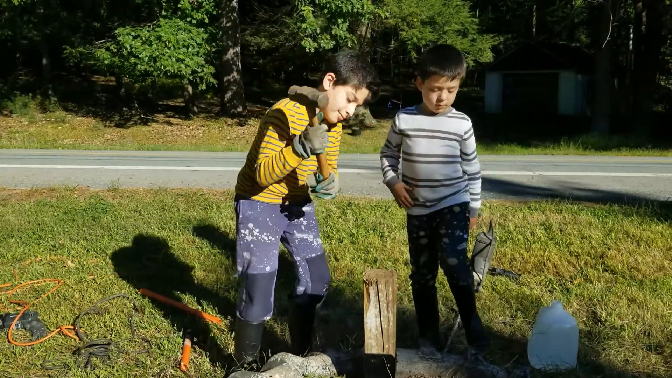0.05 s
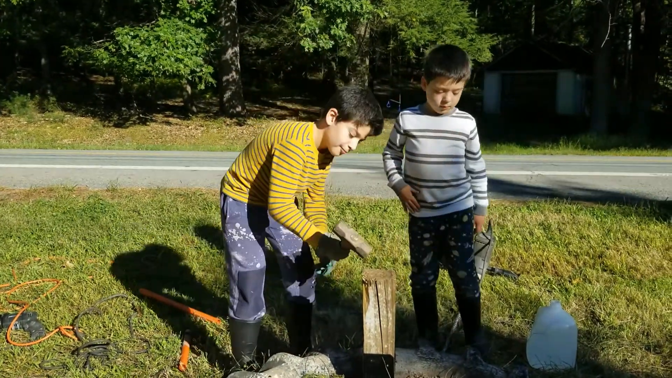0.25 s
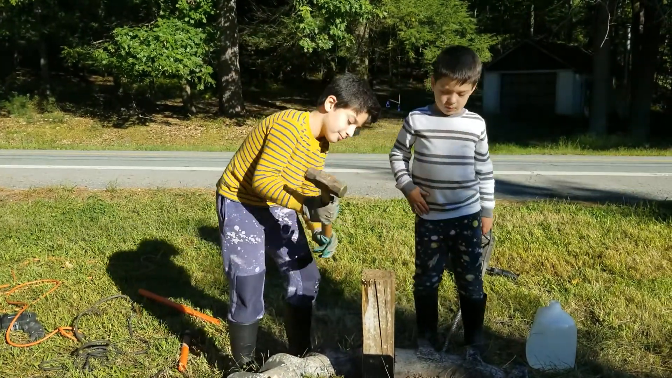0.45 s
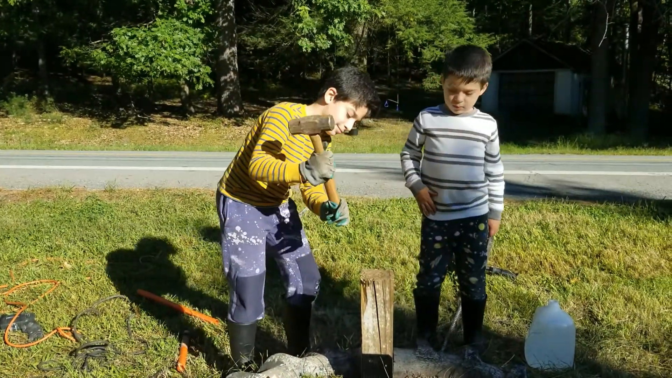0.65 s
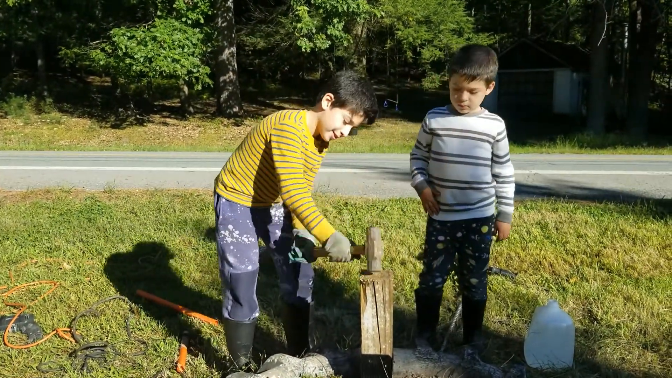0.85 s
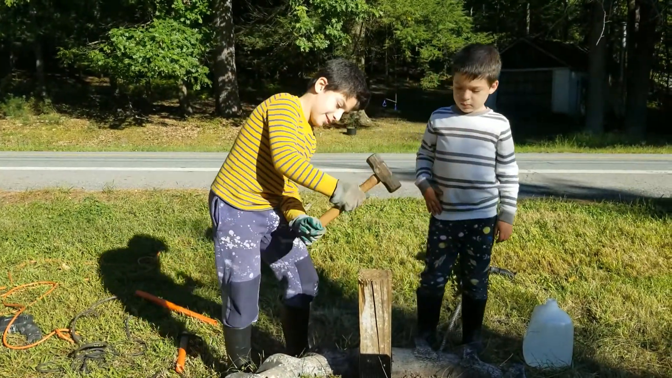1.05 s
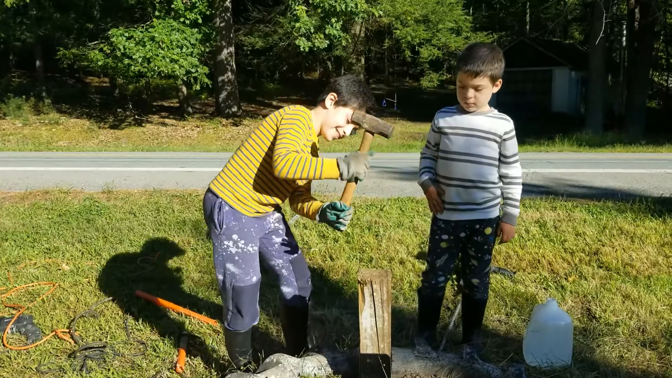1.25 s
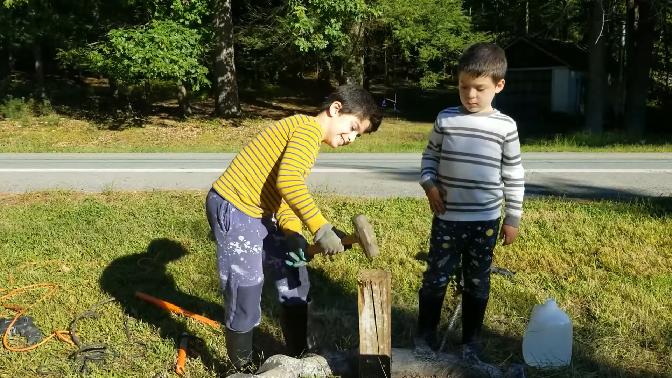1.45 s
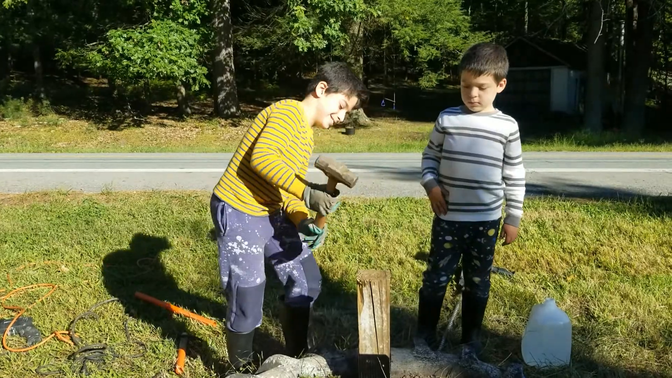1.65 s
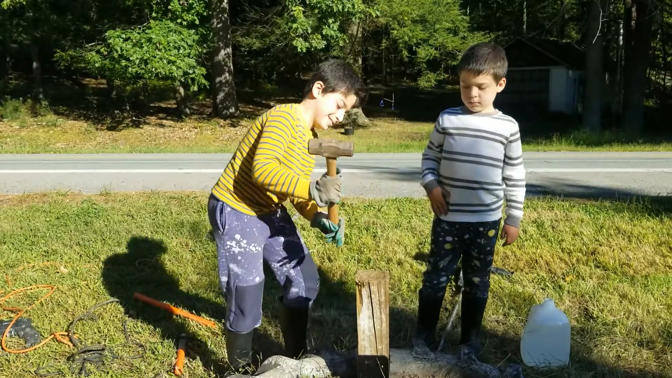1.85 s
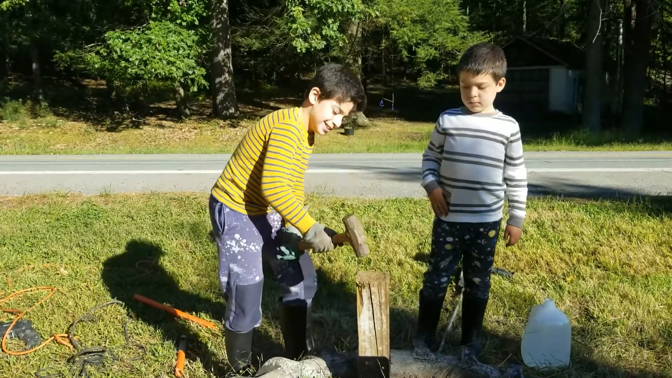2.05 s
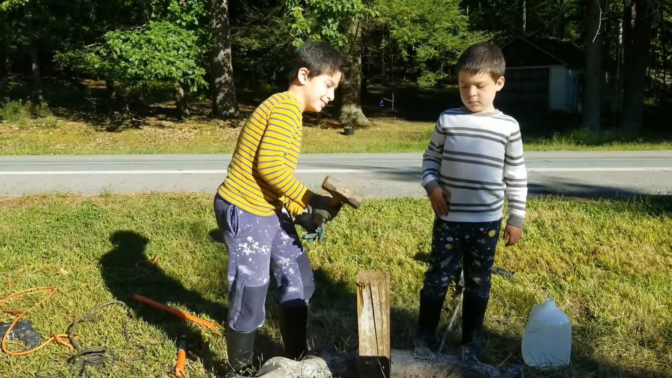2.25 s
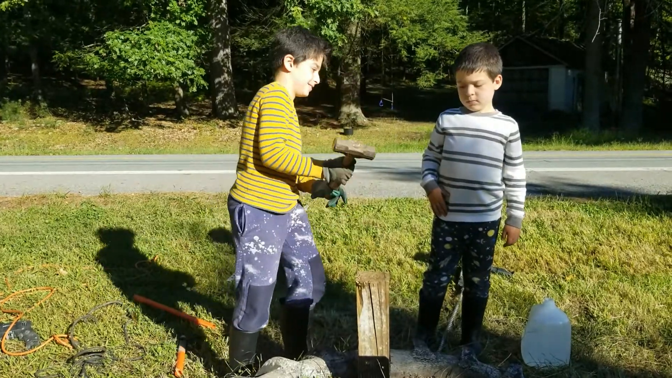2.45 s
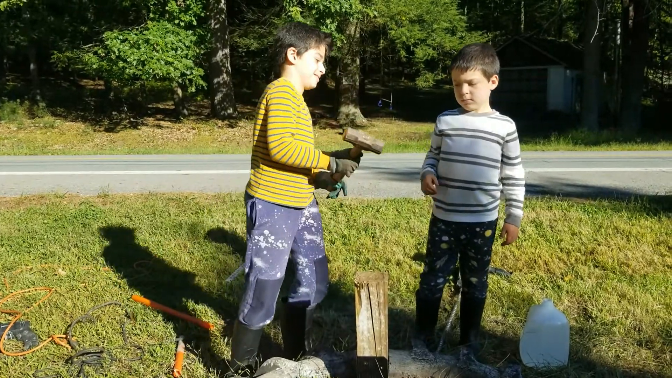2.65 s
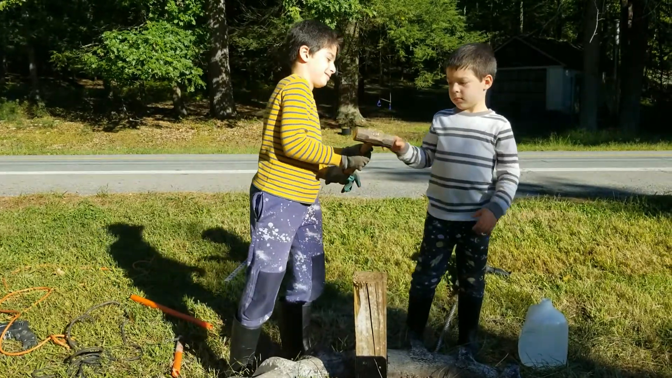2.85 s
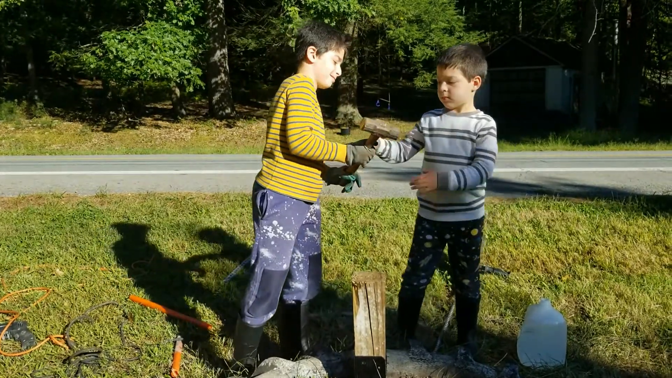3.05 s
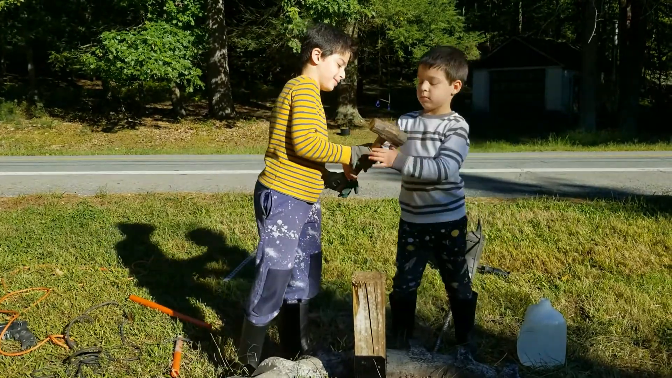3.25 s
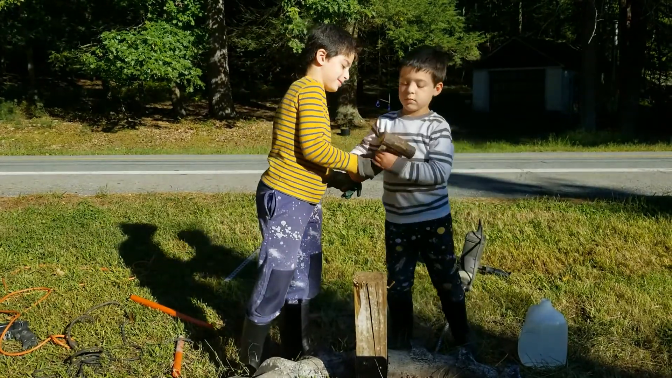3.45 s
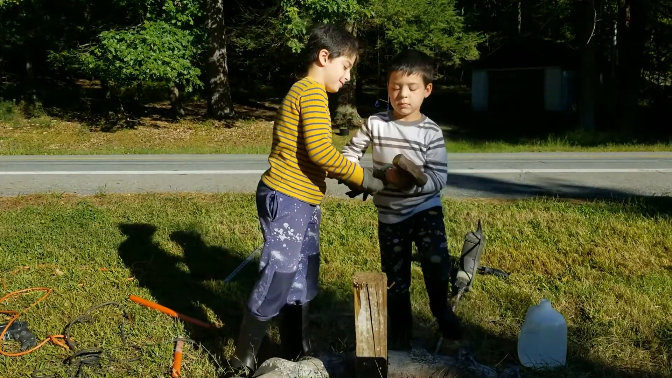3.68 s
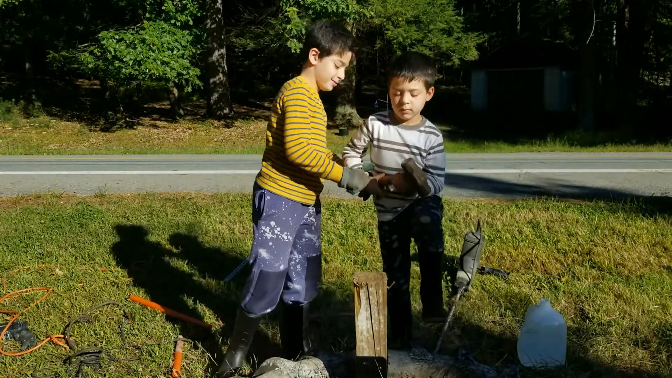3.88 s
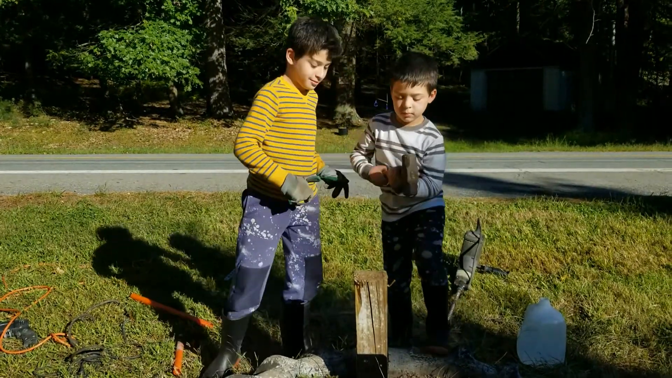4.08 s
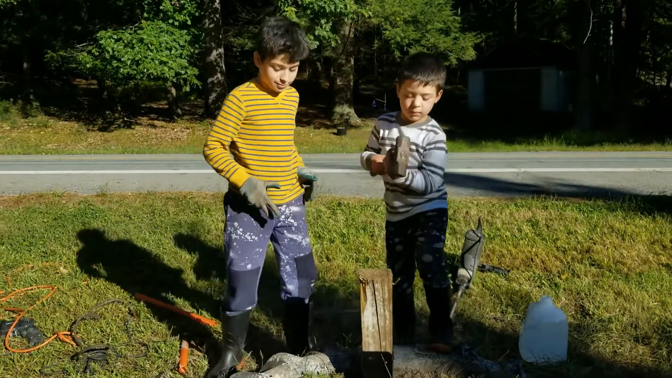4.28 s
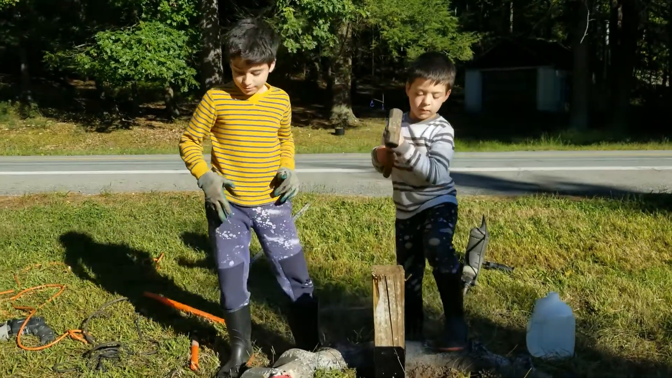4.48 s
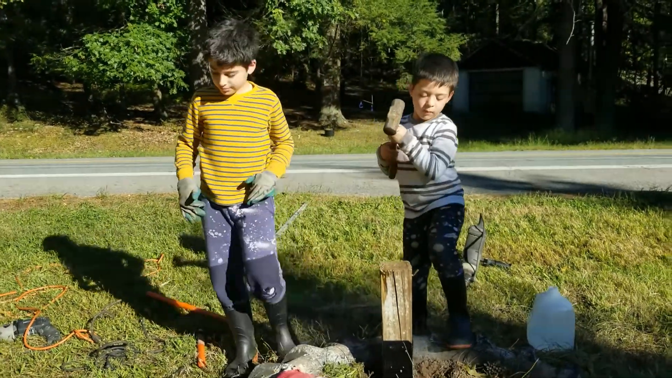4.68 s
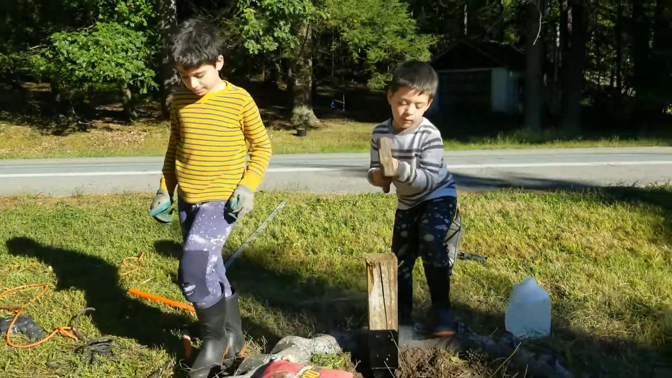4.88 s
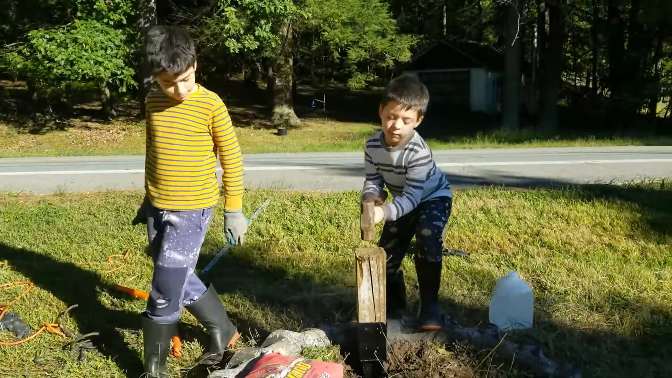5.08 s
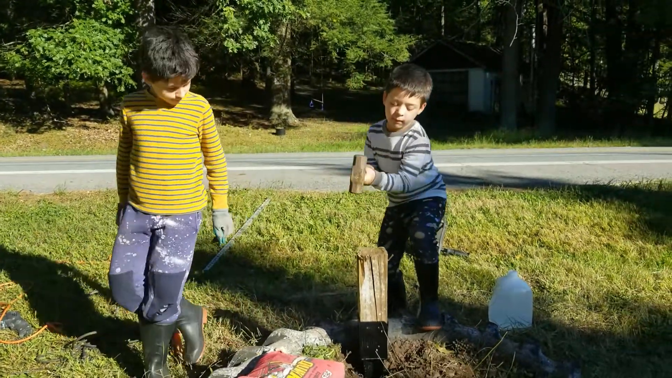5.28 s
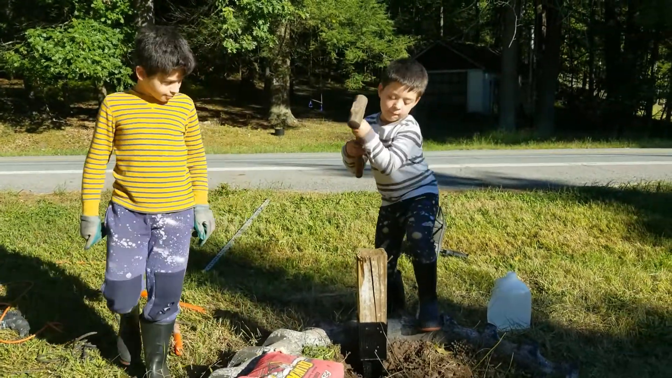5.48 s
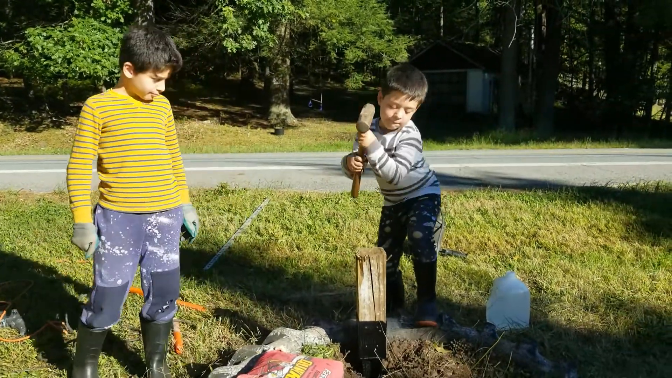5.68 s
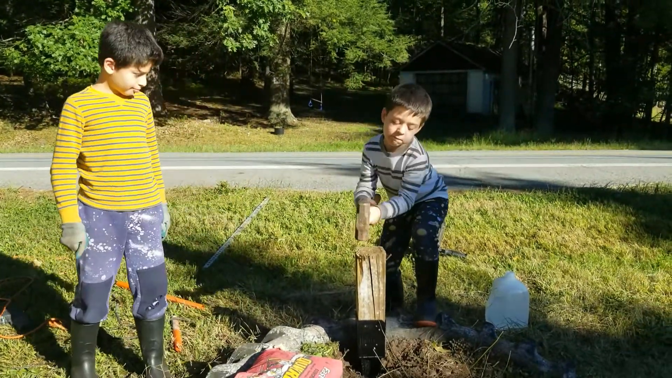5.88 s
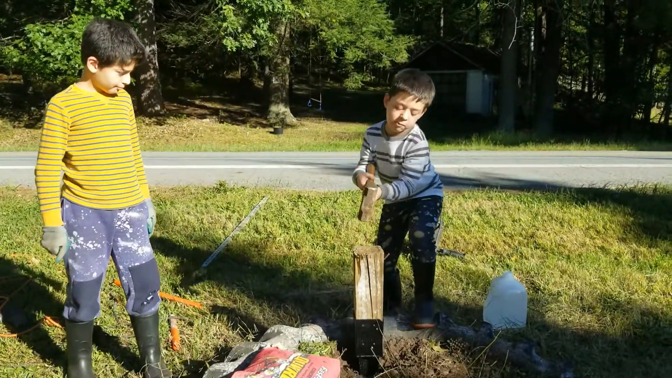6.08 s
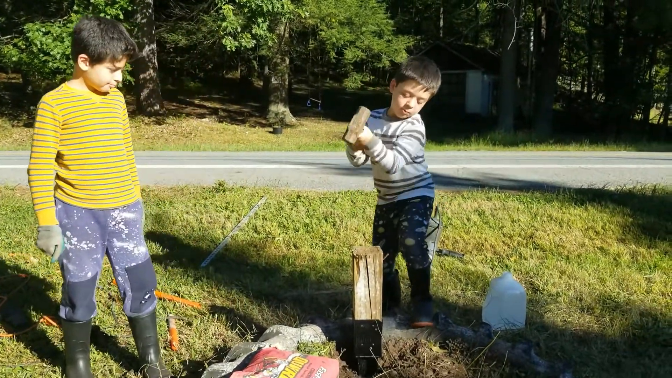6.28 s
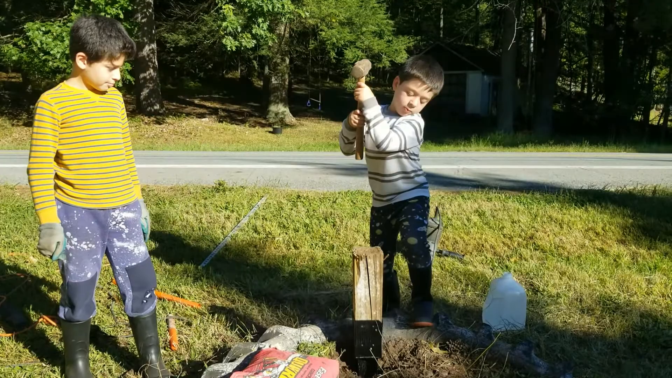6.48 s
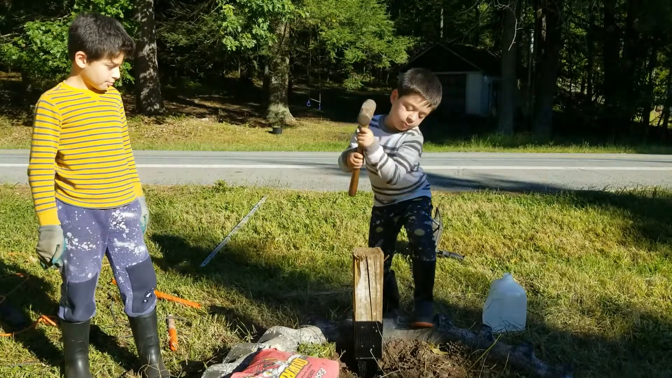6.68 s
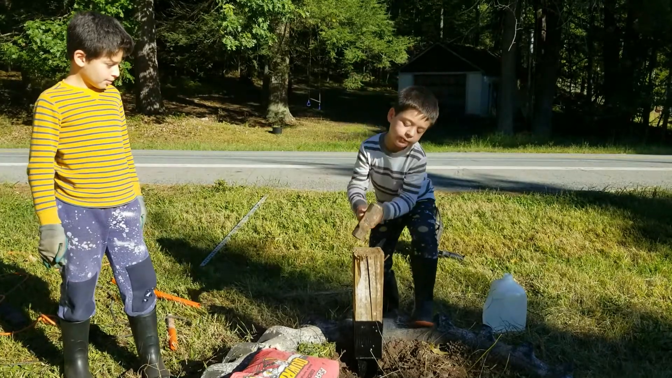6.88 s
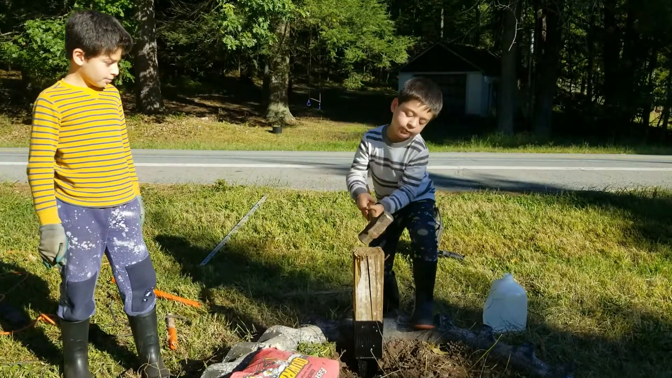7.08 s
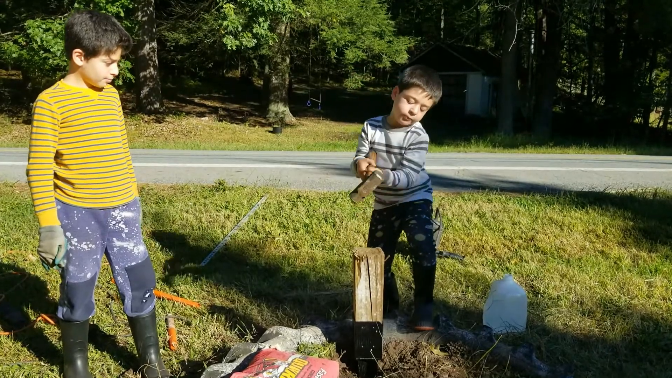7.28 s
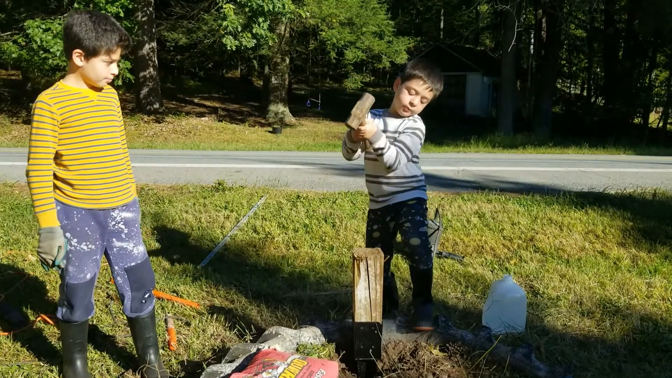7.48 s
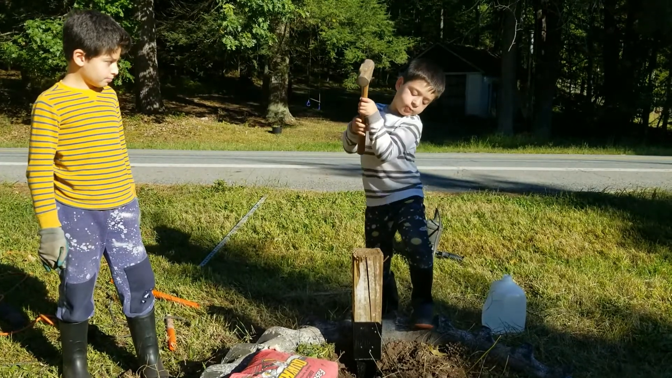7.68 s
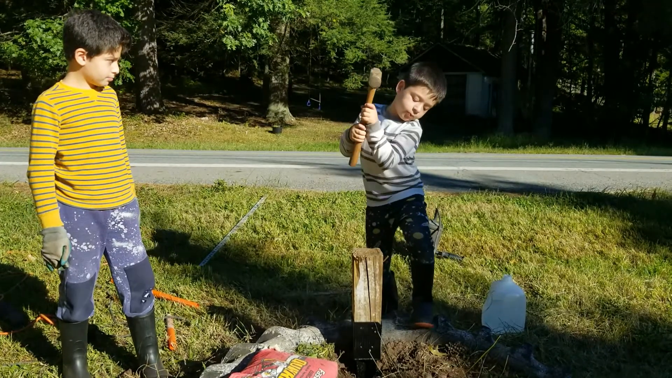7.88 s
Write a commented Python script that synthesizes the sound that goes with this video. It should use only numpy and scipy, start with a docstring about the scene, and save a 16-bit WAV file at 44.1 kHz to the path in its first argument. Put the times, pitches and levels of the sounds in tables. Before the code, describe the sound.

On a lawn beside a wood, seven cracking sledgehammer blows drive a wooden post into the soil, each with a short, faint echo. Four come quickly, then after a gap of three seconds come three more, wider apart. Soft boot steps and a slight rustle of cloth fall between them. Wind buffets the microphone midway, a far car gradually draws nearer, and insects and two thin bird calls stay very faint.

```python
"""Seven sledgehammer blows drive a wooden post into a lawn: each a crack of crushed fibres, a ping of iron,
a knock of the post and a thump of soil, answered faintly by the edge of a wood. Between them boots shift
and clothes rustle. Gusts buffet the microphone and the tyre roar of a far car draws nearer.
Insects sing throughout, and two thin bird calls slide to their pitch and fade."""
import sys
import numpy as np
from scipy import signal
from scipy.fft import rfft, irfft, next_fast_len
from scipy.io import wavfile

SR = 44100
rng = np.random.default_rng(int(sys.argv[2]) if len(sys.argv) > 2 else 0)


def output_pcm(signal):
    """Save a mono or channel-first signal as 16-bit PCM at the path in sys.argv[1].

    Samples are clipped to [-1, 1] before scaling.
    """
    pcm = np.clip(np.atleast_2d(signal).T, -1, 1) * 32767
    wavfile.write(sys.argv[1], SR, np.round(pcm).astype(np.int16))


N = 350154
TIME = np.arange(N) / SR


def hammer(crack_trim_db=-3, head_trim_db=-2, sideways_db=-8, give_s=0.0007, load_s=0.0022):
    """The crack leads; post and soil follow as the wood takes the load. Returns direct and echo send."""
    # blows: start_s, knock_db, ring_db, ring_length_factor, clack_db, crush_db, tilt_db_per_octave, send_db
    blows = [(0.2056, -9, -19, 1.7, -6, -1.5, 0.5, -0.5), (0.8461, 1.5, -4.5, 1.2, -3, -8.5, -2, -5.5),
             (1.401, 1, 4, 1.04, -4, -6.5, -3.5, -4.5), (1.9803, -1, 0, 0.71, -3, -8, -3.5, -2.5),
             (4.9940, -0.5, 0.5, 0.68, -2.5, -10, -1, -4.5), (5.8355, -1.5, -2.5, 0.99, -1, -17, 2, -1.5),
             (6.8219, -1.5, -1, 0.91, 1.5, -8.5, -5, 1)]
    # the post's main ring along the grain: pitch_hz, level_db, t60_s
    ring_modes = [(954, -10, .035), (1098, -2.5, .036), (1212, -11, .038)]
    # the post knocking as a whole: pitch_hz, level_db, t60_s
    knock_modes = [(380.1, -2, 0.016), (514, -1.5, 0.022), (682, -11.5, .025), (819, -14.5, 0.038)]
    # cross-grain clack, woken by an off-centre face: pitch_hz, level_db, t60_s
    clack_modes = [(1367, -13.5, 0.033), (1533, -13.5, .032), (1770, -13.5, 0.025), (2025.5, -15.5, 0.028),
                   (2316, -17, 0.032)]
    # low thump of the post and the soil round it: pitch_hz, level_db, t60_s
    soil_modes = [(72, -26, 0.065), (112, -20, 0.073), (186, -19, 0.041)]
    # ping of the iron head, damped by the wood: pitch_hz, level_db, t60_s
    head_modes = [(2490, -14.5, 0.0063), (5070, -8.5, 0.016), (8190, -15.5, .022), (9290, -19, 0.01)]
    # splinters and the loose handle: start_s, level_db, tilt_db_per_octave
    ticks = [(0.2327, -26, 2.5), (7.0527, -33.5, -6.5)]
    direct, send, t = np.zeros(N), np.zeros(N), TIME[:SR // 4]
    for start_s, knock_db, ring_db, length, clack_db, crush_db, tilt_db, send_db in blows:
        ring = struck(ring_modes, t, scatter_db=3.5, detune=0.005, length=length) * onset(t, load_s)
        body = from_db(ring_db) * ring
        body += from_db(knock_db) * struck(knock_modes, t, scatter_db=2, detune=0.014)
        body -= from_db(clack_db) * struck(clack_modes, t, scatter_db=0.5, detune=0.028)
        body -= struck(soil_modes, t, scatter_db=-1.4, detune=0.01)
        body += from_db(head_trim_db + crush_db) * struck(head_modes, t, scatter_db=0.5, detune=0.0034)
        blow = from_db(crack_trim_db + crush_db) * crack(t, tilt_db)
        add(blow, give_s, body)
        add(direct, start_s, blow)
        add(send, start_s, from_db(send_db) * blow)
        # the post's flanks throw the ring to the trees however the face lands
        add(send, start_s + give_s, from_db(sideways_db) * ring)
    for start_s, level_db, tilt_db in ticks:
        add(direct, start_s, from_db(level_db) * crack(t, tilt_db))
    return direct, send


def crack(t, tilt_db, rise_s=0.00041, crush_s=0.002, buzz_db=-12, buzz_t60_s=0.035):
    """Fibres give way while the face presses in, then the split end grain buzzes out."""
    # colour of crushing fibres: frequency_hz, level_db
    fibre_colour = [(700, -0.5), (1500, 1), (2600, -3.5), (3200, -5), (3700, 0), (4200, -4.5), (5100, -1.5),
                    (6300, -9), (9300, -5.5), (10600, -17.5), (15000, -18)]
    pressure = np.exp(-(t / crush_s) ** 2) + from_db(buzz_db) * dying(t, buzz_t60_s)
    return noise(fibre_colour, len(t), tilt_db) * pressure * onset(t, rise_s)


def struck(modes, t, scatter_db, detune, length=1):
    """Modes of alternating sign ring out from their full level and die away; each blow finds them a little
    changed."""
    out = 0
    for k, (hz, level_db, t60_s) in enumerate(modes):
        gain = (-1) ** k * from_db(level_db + scatter_db * rng.standard_normal())
        pitch_hz = hz * (1 + detune * rng.standard_normal())
        out += gain * dying(t, t60_s * length) * np.sin(2 * np.pi * pitch_hz * t)
    return out


def echoes(send, near_t60_s=0.13, trees_s=0.08, swell_s=0.006, lawn_db=-1.5):
    """Close things scatter each blow at once, the trunks later; so many paths blur it into noise."""
    # echo of things close by: frequency_hz, level_db
    near_colour = [(150, -25.5), (480, -35.5), (1100, -30), (2500, -22), (6000, -18), (15000, -16)]
    # echo of the trees: frequency_hz, level_db
    tree_colour = [(150, -36), (480, -35.5), (750, -30), (1100, -36.5), (1700, -26.5), (2600, -25),
                   (5000, -23), (9000, -21.5), (15000, -26.5)]
    # decay among the trees: frequency_hz, t60_s
    tree_decay = [(150, 1), (1000, 0.99), (2500, 0.56), (5000, 0.74), (9000, 0.33), (15000, 0.22)]
    t, out = TIME[:SR], 0
    edges_hz = np.geomspace(120, 17000, 17)
    arrival = from_db(lawn_db) * onset(t, swell_s) + 0.5 * (1 + np.tanh((t - trees_s) / swell_s))
    near = (dying(t, near_t60_s) * onset(t, swell_s)) ** 2
    for band in zip(edges_hz, edges_hz[1:]):
        hz = np.sqrt(band[0] * band[1])
        far = (arrival * dying(t, at_hz(tree_decay, hz))) ** 2
        paths = from_db(at_hz(tree_colour, hz)) ** 2 * far / far.sum()
        paths += from_db(at_hz(near_colour, hz)) ** 2 * near / near.sum()
        energy = signal.fftconvolve(cut(send + 1e-18, band, "band") ** 2, paths)[:N]
        wash = rms_one(cut(rng.standard_normal(N), band, "band", order=3))
        out += np.sqrt(np.abs(energy)) * wash
    return out


def boots(rise_s=0.0016, t60_s=0.093):
    """Boots on turf and soft bumps: dull puffs that die quickly."""
    # contacts: start_s, level_db, top_hz
    contacts = [(3.305, -38.5, 64), (3.973, -36.5, 604), (3.996, -42, 447), (4.847, -31.5, 600),
                (5.656, -48.5, 352), (7.053, -36, 450)]
    out, t = np.zeros(N), TIME[:SR // 4]
    for start_s, level_db, top_hz in contacts:
        dull = cut(rng.standard_normal(len(t)), top_hz, "low", order=3)
        puff = rms_one(cut(dull, 34, "high"))
        add(out, start_s, from_db(level_db) * puff * onset(t, rise_s) * dying(t, t60_s))
    return out


def rustles(grain_db=2.5, snag_db=4, snags_per_s=15):
    """Cloth slides in short grainy strokes and snags now and then."""
    # sleeves, gloves and grass: middle_s, half_length_s, level_db
    moves = [(0.455, 0.011, -60), (3.143, 0.046, -83), (3.623, 0.021, -77), (4.137, 0.13, -71.5),
             (4.585, 0.1, -73.5), (4.99, 0.1, -62), (5.331, 0.092, -76), (5.664, 0.038, -59.5),
             (7.1, 0.043, -73)]
    # colour of sliding cloth: frequency_hz, level_db
    cloth_colour = [(1470, -14.5), (2500, 0.5), (2770, -4), (4440, -4), (6810, -2.5), (11100, -12),
                    (13800, -7.5), (16000, -12)]
    strokes = sum(from_db(level_db) * bell(middle_s, half_s) for middle_s, half_s, level_db in moves)
    catches = rng.random(N) < snags_per_s / SR
    snags = signal.lfilter([1], [1, -dying(1 / SR, t60_s=0.012)], catches + 1e-18)
    return strokes * noise(cloth_colour) * (from_db(grain_db * drift(210)) + from_db(snag_db) * snags)


def wind(breeze_db=-75.5, rise_s=0.16, fall_db_per_s=55, eddies_per_s=15, lumps_db=4.5):
    """Gusts build, hold and sink back into a breeze; their eddies buffet the microphone unevenly."""
    # gusts: peak_s, hold_s, level_db
    gusts = [(0.03, 0.2, -57), (1.65, .1, -68.5), (4.68, 0.29, -31.5), (5.856, 0.14, -49),
             (6.803, .03, -47), (7.499, 0.18, -69)]
    # colour of the buffeting: frequency_hz, level_db
    buffet_colour = [(12, -36.5), (20, -7), (43, 5), (77, -1), (112, -10.5), (187, -27.5), (367, -36),
                     (500, -39.5), (650, -70), (1100, -120)]
    strength = from_db(breeze_db)
    for peak_s, hold_s, level_db in gusts:
        fall = from_db(-fall_db_per_s * np.maximum(TIME - peak_s - hold_s, 0))
        strength += from_db(level_db) * np.where(TIME < peak_s, bell(peak_s, rise_s), fall)
    turns = np.cumsum(eddies_per_s * np.exp(0.41 * drift(5.8))) / SR
    buffeting = from_db(lumps_db * np.sin(2 * np.pi * turns) + 0.97 * drift(26))
    return strength * buffeting * noise(buffet_colour)


def far_car(final_db=-52, climb_db_per_s=2.5, levels_off_s=6.78, nearing_s=3.04, nearing_lasts_s=3.4,
            swell_db=6.5, swell_nearness=0.23, tread_final_db=-63, tread_db_per_s=7):
    """Tyre roar grows and widens as the car nears, swelling once on the way; tread hiss comes up late."""
    # the roar far off: frequency_hz, level_db
    far_colour = [(120, -4.5), (200, -5), (400, -12), (650, -5), (900, 2), (1350, -1.5), (1650, -3.5),
                  (2100, -18.5), (3000, -35)]
    # the roar nearer by: frequency_hz, level_db
    near_colour = [(71, -37), (120, -6.5), (173, -7.5), (279, -1.5), (414, -9), (523, -4), (596, -9),
                   (689, -1.5), (1390, -3.5), (1650, -4), (3900, -47.5), (5070, -70), (8580, -120)]
    # tread hiss that carries only at close range: frequency_hz, level_db
    tread_colour = [(1500, 1), (2500, -4.5), (3300, -12), (4500, -21.5)]
    swell = bell(middle_s=4.81, half_s=0.31)
    level_db = final_db - climb_db_per_s * np.maximum(levels_off_s - TIME, 0) + swell_db * swell
    level_db += 0.03 * drift(6)
    nearness = np.clip((TIME - nearing_s) / nearing_lasts_s + swell_nearness * swell, 0, 1)
    roar = np.sqrt(1 - nearness) * noise(far_colour) + np.sqrt(nearness) * noise(near_colour)
    hiss = from_db(tread_final_db + tread_db_per_s * (TIME - TIME[-1])) * noise(tread_colour)
    return from_db(level_db) * roar + hiss


def insects(chorus_db=-78, trill_hz=8200, trill_db=-85):
    """A steady far chorus and trill, and nearer katydids whose pitch falls through each wing stroke."""
    # insect chorus and air: frequency_hz, level_db
    chorus_colour = [(2400, -11.5), (3000, -12), (3400, -4), (3900, -12), (4400, -6.5), (5050, 5.5),
                     (5700, -11), (6600, -13.5), (7700, -12.5), (8250, -4.5), (9200, -12), (10500, -23.5),
                     (15500, -22.5)]
    # katydids: strokes_per_s, start_hz, end_hz, level_db
    katydids = [(15.8, 8900, 8400, -77), (17.0, 7300, 7050, -84), (16.4, 8300, 8150, -83)]
    out = from_db(chorus_db) * noise(chorus_colour)
    out += from_db(trill_db) * rasp(np.full(N, trill_hz), width_hz=130)
    for strokes_per_s, start_hz, end_hz, level_db in katydids:
        cycle = (np.cumsum(strokes_per_s * (1 + 0.01 * drift(3))) / SR) % 1
        pitch_hz = start_hz + (end_hz - start_hz) * np.clip(2 * cycle - 0.5, 0, 1)
        stroke = np.sin(np.pi * cycle) ** 8
        out += from_db(level_db) * stroke * rasp(pitch_hz, width_hz=80)
    return out


def birds(glide_s=0.057):
    """Each high buzzy note slides to its pitch, holds it and fades among the trees."""
    # thin calls: start_s, start_hz, held_hz, width_hz, attack_s, t60_s, level_db
    calls = [(3.06, 3420, 3380, 150.2, .08, 1.0, -78.5), (7.23, 8200, 9200, 420, 0.026, 0.66, -68.5)]
    out = np.zeros(N)
    for start_s, start_hz, held_hz, width_hz, attack_s, t60_s, level_db in calls:
        t = np.maximum(TIME - start_s, 0)
        pitch_hz = start_hz + (held_hz - start_hz) * np.minimum(t / glide_s, 1)
        envelope = np.minimum(t / attack_s, 1) * dying(np.maximum(t - attack_s, 0), t60_s)
        out += from_db(level_db) * envelope * rasp(pitch_hz, width_hz)
    return out


def rasp(pitch_hz, width_hz):
    """A rasping tone: slow noise carried on a pitch; rms 1."""
    carrier = np.sin(2 * np.pi * np.cumsum(pitch_hz) / SR)
    return rms_one(cut(rng.standard_normal(N), width_hz, "low") * carrier)


def noise(colour, size=N, tilt_db=0):
    """Coloured noise, tilted by tilt_db per octave, falling steeply past the colour's ends; rms 1."""
    padded = next_fast_len(size)
    hz = np.maximum(np.fft.rfftfreq(padded, 1 / SR), 1)
    octaves_outside = np.abs(np.log2(hz / np.clip(hz, colour[0][0], colour[-1][0])))
    gain = from_db(at_hz(colour, hz) + tilt_db * np.log2(hz) - 36 * octaves_outside)
    return rms_one(irfft(rfft(rng.standard_normal(padded)) * gain, padded)[:size])


def drift(rate_hz):
    """A random wander, gliding between values of spread 1."""
    return np.interp(TIME * rate_hz, np.arange(4096), rng.standard_normal(4096))


def onset(t, rise_s):
    """Exponential attack from 0 to 1."""
    return 1 - np.exp(-t / rise_s)


def dying(t, t60_s):
    """Exponential decay, 60 dB down at t60_s."""
    return np.exp(-np.log(1000) * t / t60_s)


def bell(middle_s, half_s):
    """A smooth swell of height 1."""
    return np.exp(-0.5 * ((TIME - middle_s) / half_s) ** 2)


def cut(x, hz, kind, order=2):
    """Butterworth filter."""
    return signal.sosfilt(signal.butter(order, np.clip(hz, 10, 0.48 * SR), kind, fs=SR, output="sos"), x)


def at_hz(points, hz):
    """Read a curve on a log-frequency axis."""
    frequencies, values = np.transpose(points)
    return np.interp(np.log(hz), np.log(frequencies), values)


def add(track, start_s, sound):
    """Mix a sound in from start_s."""
    start = int(round(start_s * SR))
    track[start:start + len(sound)] += sound[:len(track) - start]


def from_db(db):
    """Decibels to gain."""
    return 10 ** (np.asarray(db) / 20)


def rms_one(x):
    """Scale to unit power."""
    return x / np.sqrt(np.mean(x ** 2) + 1e-20)


def scene():
    """Blows and their echo over the sounds of the yard, in mono."""
    direct, send = hammer()
    return (direct + echoes(send) + boots() + rustles() + far_car() + wind() + insects() + birds())[None]


def record(dry, cutoff_hz=15800):
    """Soft clipping rounds the loudest peaks; a steep low-pass cuts the top."""
    rounded = dry / (1 + dry ** 4) ** (1 / 4)
    return signal.sosfilt(signal.ellip(10, 0.2, 70, cutoff_hz, fs=SR, output="sos"), rounded)


dry = scene()
out = record(dry)
output_pcm(out)
```